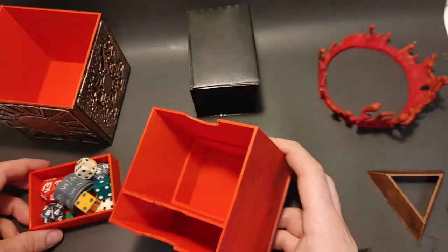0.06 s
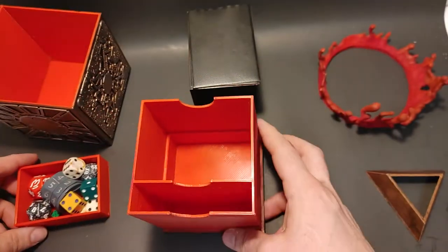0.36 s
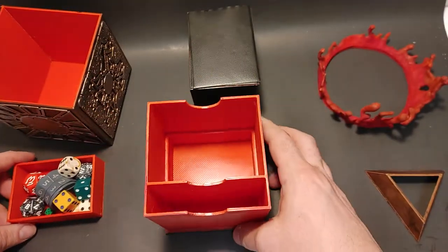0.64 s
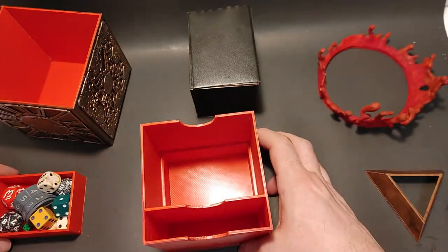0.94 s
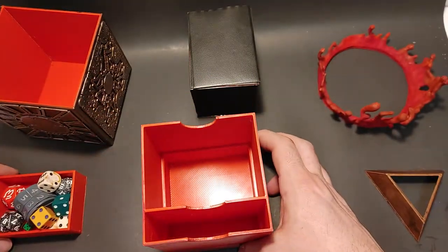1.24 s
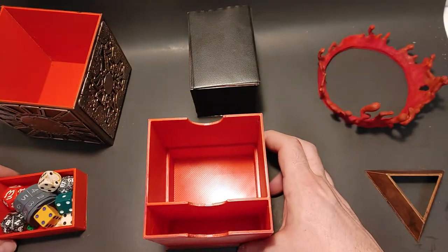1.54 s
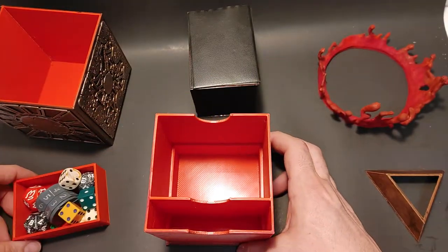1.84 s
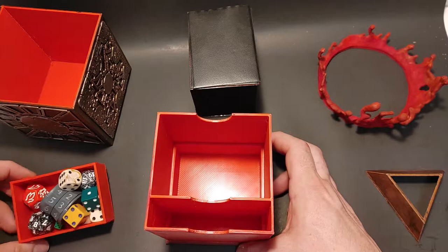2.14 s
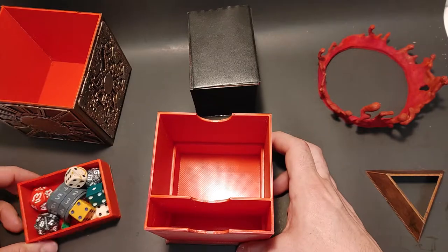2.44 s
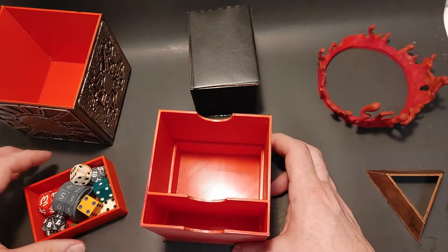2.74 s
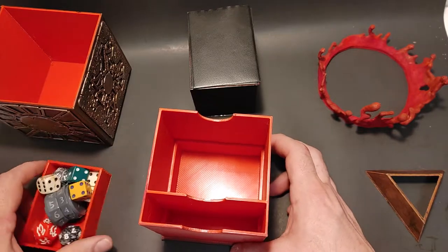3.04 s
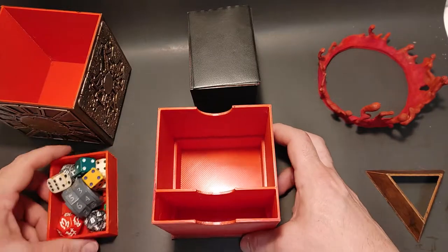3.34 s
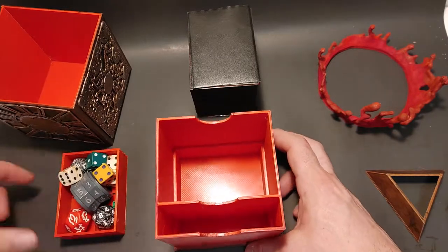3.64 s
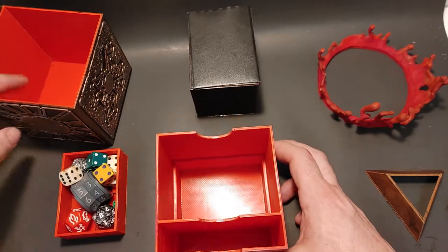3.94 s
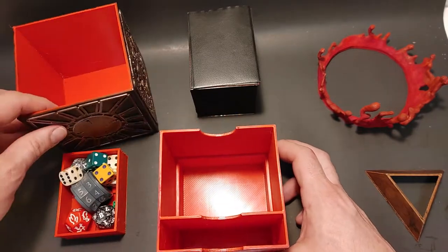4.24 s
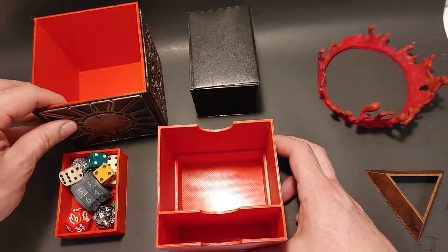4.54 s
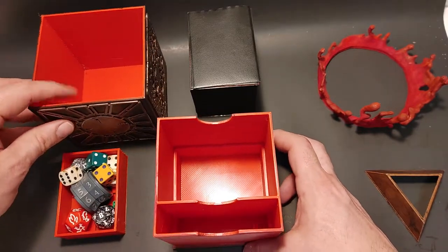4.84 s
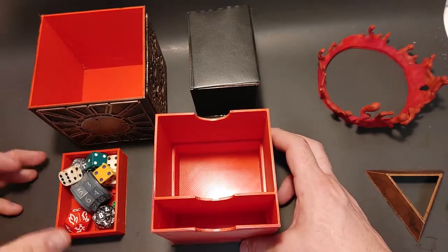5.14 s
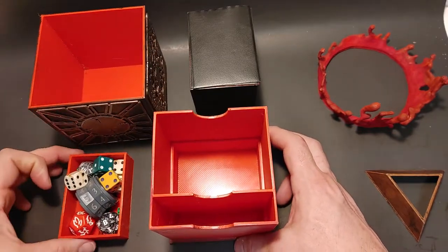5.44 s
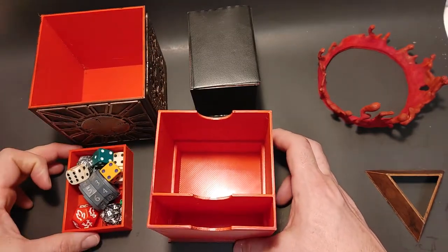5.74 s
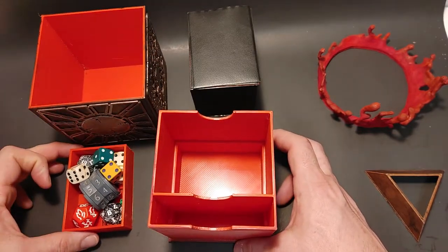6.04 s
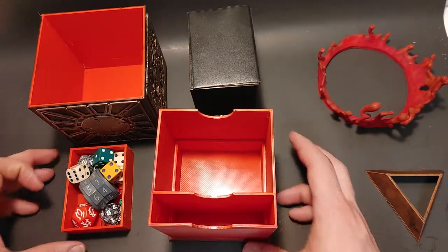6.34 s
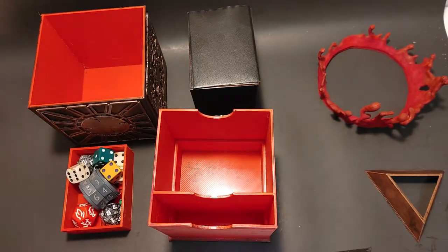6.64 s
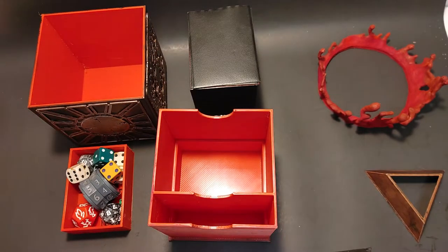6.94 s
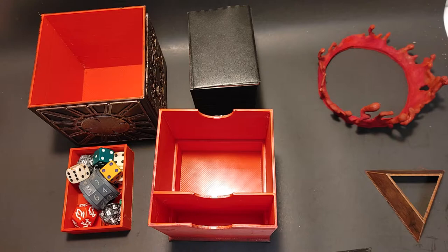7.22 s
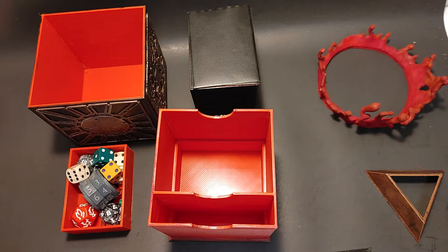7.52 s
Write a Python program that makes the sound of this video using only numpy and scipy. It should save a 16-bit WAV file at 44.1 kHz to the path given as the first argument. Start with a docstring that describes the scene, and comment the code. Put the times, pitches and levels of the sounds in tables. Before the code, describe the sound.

Close to a stereo microphone pair in a small room, a hollow plastic box bumps and slides over a table mat. Dice click lightly, then clatter as their little tray drops onto the table and gets shifted around. After a short, juddering scrape from a bigger box comes one more rattle of dice. Soft swishes of a hand follow, leaving only the low, slowly wavering hum of fans.

```python
"""A mat-covered table in a small room, close to a stereo pair of microphones; two fans hum throughout.
First an empty plastic box is set down and pushed about: its walls ring, its base rubs on the mat.
At 2.5 s a little tray of dice drops onto the table and is turned and nudged; the dice click and rebound.
At 4 s a larger box scrapes round, juddering, and at 5.4 s the dice rattle once more.
Last, a hand brushes the mat and leaves the fans beating against each other over a soft rush of air."""
import sys
import numpy as np
from scipy import signal
from scipy.fft import rfft, irfft, next_fast_len
from scipy.io import wavfile
from scipy.ndimage import map_coordinates

SR = 44100
rng = np.random.default_rng(int(sys.argv[2]) if len(sys.argv) > 2 else 0)


def master_out(mix):
    """Clip the mix to full scale and print it as 16-bit PCM to the path in sys.argv[1]."""
    frames = np.transpose(np.atleast_2d(mix))
    ceiling = np.clip(frames, -1, 1)
    pcm = np.round(ceiling * 32767).astype(np.int16)
    wavfile.write(sys.argv[1], SR, pcm)


N = 343098
TIME = np.arange(N) / SR
RING_TIME = np.arange(SR // 3) / SR


def dice(rebound_s=.027, loss_db=15.5, pan_db=.5):
    """Dice click on each other and the tray walls, then rock back twice, each time sooner and weaker."""
    # first contacts (time [s], level [dB], contact cut-off [Hz], scuff [dB])
    clicks = [(1.557, -58, 9000, 10), (1.586, -44, 6200, 12.5), (2.136, -39, 7500, 7.5),
              (2.166, -31.5, 4500, 0.5), (2.185, -39, 4850, 14), (2.200, -43.5, 6060, 3),
              (2.525, -35.5, 6760, -4), (2.540, -20.5, 5000, 2), (2.544, -27, 15500, -8),
              (2.549, -25, 7250, 2), (2.556, -24.5, 6940, 5), (2.636, -46.5, 3000, -7),
              (2.915, -46, 3020, 7), (2.943, -32, 11200, 1.5), (2.963, -37.5, 5000, 3),
              (3.007, -37.5, 4670, 9), (3.079, -38.5, 8000, 9), (3.174, -44, 3060, 8.5),
              (3.321, -49, 7000, -4), (3.357, -45, 7040, 16), (3.363, -30.5, 8060, 4),
              (3.371, -34, 7900, 8.5), (3.398, -40, 6000, 14), (3.437, -27.5, 7900, -4.5),
              (3.477, -32.5, 4080, -9.5), (5.413, -48, 4470, 12.5), (5.497, -35, 10400, 0),
              (5.511, -29.5, 8150, 10.5), (5.524, -33, 7100, -10), (5.567, -35, 8700, -10),
              (5.639, -31, 8400, -12), (5.668, -45.5, 6010, 0)]
    # main modes (frequency [Hz], relative level [dB], t60 before damping [s])
    modes = [(1820, -16, 0.01), (2030, 2, 0.13), (2200, -5.5, 0.1), (2320, -2, 0.18), (2546, 0.5, 0.26),
             (2706, 5.5, 0.11), (2776, 1.5, 0.088), (3100, -7.5, 0.14), (3003, -10.5, .05),
             (3570, -11.5, 0.014), (3845, 4.5, 0.15), (4144, 9, 0.14), (4370, -13.5, 0.076),
             (4800, -7.5, .06), (5360, -5, 0.085), (5640, 2, 0.09), (6340, -13.5, 0.0582), (6650, -4, 0.24),
             (6882, 10.5, 0.21), (7200, -11.5, .06), (9550, -1.5, 0.059), (10900, -11, .05),
             (11000, -6.5, .05), (12950, -5.5, .05)]
    # spectrum of the weak, fast-dying modes (frequency [Hz], relative level [dB])
    crowd = [(60, -53.5), (250, -27.5), (900, -16.5), (1600, -5), (2300, 2), (4200, 0), (7000, -1),
             (8200, -6.5), (11000, -6.5), (13500, -4.5), (16000, -7)]
    contacts = []
    for s, db, contact_hz, scuff_db in clicks:
        contacts.append((s, db, contact_hz, pan_db, scuff_db))
        for bounce in (1, 2):
            s += rebound_s / bounce * (1 + .2 * rng.uniform(-1, 1))
            contacts.append((s, db - loss_db * np.sqrt(bounce), contact_hz, pan_db, -2))
    return blows(contacts, modes, crowd, crowd_db=1, crowd_t60=.087, crack_db=-.5, vary_db=5,
                 graze_db=-12.5)


def tray():
    """The little dice tray knocks on the table and rings briefly."""
    # contacts (time [s], level [dB], contact cut-off [Hz], left over right [dB], scuff [dB])
    knocks = [(1.588, -48.5, 2500, -5, 18), (2.166, -49, 3000, 0, 8.5), (2.525, -37.5, 1770, -7, -1.5),
              (2.540, -20.5, 2490, -4.5, 1), (2.549, -23.5, 1300, -3.5, 1.5), (2.955, -50, 244, 3, 13),
              (3.011, -54.5, 2500, 4, 33.5), (3.080, -45.5, 2000, -3, -3), (3.363, -37.5, 2500, -3.5, 23),
              (3.380, -44, 1483, -9, 23.5), (3.437, -47.5, 247, 11, -10), (3.477, -47.5, 262, -1, -20),
              (5.414, -46.5, 237, 3, 8), (5.498, -41, 3000, -2.5, 19), (5.518, -54, 3038, -5, 30),
              (5.639, -50, 2000, 8, -23)]
    # main modes (frequency [Hz], relative level [dB], t60 before damping [s])
    modes = [(222, 1, .16), (335, 1, .13), (385, -3, .1), (515, -2, .09), (590, 1, .09), (705, -2, .08),
             (818, 3, .09), (915, -1, .09), (1007, -7, .09), (1310, -13, .06), (1772, -8, .08)]
    # spectrum of the weak, fast-dying modes (frequency [Hz], relative level [dB])
    crowd = [(40, -53), (170, -29.5), (235, -2.5), (600, -7), (900, -2.5), (1250, 4), (1700, -1),
             (3000, -9), (16000, -39.5)]
    return blows(knocks, modes, crowd, crowd_db=-4.5, crowd_t60=.074, crack_db=-13.5, vary_db=2,
                 graze_db=-24.5)


def empty_boxes():
    """Empty boxes meet the mat with dull, hollow knocks."""
    # contacts (time [s], level [dB], contact cut-off [Hz], left over right [dB], scuff [dB])
    knocks = [(.131, -29.5, 785, 1, 5), (.138, -23.5, 358, -4, -21.5), (.148, -33.5, 417, -10.5, 8.5),
              (.236, -39.5, 370, -4.5, 10), (.318, -47.5, 257, 4, 14), (.35, -50, 256, -6, 12.5),
              (.455, -42, 566, -2.5, 8), (.532, -24, 920, -4, 3.5), (.539, -27, 700, -4, 11),
              (.778, -38, 1060, 2.5, 13), (4.018, -57, 1500, 7, 24)]
    # main modes (frequency [Hz], relative level [dB], t60 before damping [s])
    modes = [(79, -10, .22), (224, 2.5, 0.18), (300, 6.5, 0.08), (332.6, 8, 0.081), (392, 10.5, 0.032),
             (516, -3, 0.16), (531, -0.5, 0.14), (630, -13.5, 0.11), (748, -3, 0.067), (876, -6, 0.1),
             (972, -6, 0.09), (1167, -6, .1), (2000, 4, 0.033)]
    # spectrum of the weaker modes (frequency [Hz], relative level [dB])
    crowd = [(30, -42), (60, -11), (80, 4), (125, -6), (175, -12), (290, -13), (420, -13.5), (700, -24),
             (1300, -31), (4000, -7.5), (16000, -34)]
    return blows(knocks, modes, crowd, crowd_db=-15.5, crowd_t60=.33, crack_db=-13, vary_db=1.5,
                 graze_db=-19)


def blows(contacts, modes, crowd, crowd_db, crowd_t60, crack_db, vary_db, graze_db):
    """Soft contacts are dull; square hits crack, scuffing ones graze first and wake more modes."""
    out = np.zeros((2, N))
    for s, db, contact_hz, pan_db, scuff_db in contacts:
        hit = strike(modes, crowd, crowd_db + scuff_db / 2, crowd_t60, crack_db - scuff_db, vary_db)
        rise_s = .0008 * from_db(2 * scuff_db)   # a scuff builds up more slowly
        hit = hit * (1 - np.exp(-RING_TIME / rise_s))
        hit = cut(cut(hit, contact_hz, "low"), 94, "high")   # small boxes radiate no deep bass
        onset_rms = np.sqrt(np.mean(hit[:, :SR // 50] ** 2))
        hit = from_db(db) * panned(hit / onset_rms, pan_db)
        add(out, s, hit)
        add(out, s - rng.uniform(.0024, .007), from_db(graze_db + scuff_db) * hit)
    return out


def strike(modes, crowd, crowd_db, crowd_t60, crack_db, vary_db):
    """One blow: a crack, a crowd of weak modes, and main modes whose strengths depend on the spot hit."""
    hz, db, t60 = np.array(modes, float).T[:, :, None]
    t60 = np.minimum(t60, .16 * (200 / hz) ** .3)   # plastic damps high modes sooner
    strength, detune, left, right = rng.standard_normal((4, len(hz), 1))
    lag = np.array([left, right]) * np.minimum(hz / 800, 2)   # short waves differ in phase at each mic
    angle = 2 * np.pi * hz * (1 + .004 * detune) * RING_TIME
    fade = from_db(-60 * RING_TIME / t60)
    gain = from_db(db + vary_db * strength) * rng.choice([-1, 1], hz.shape)
    gain = gain / np.sqrt(np.sum(gain ** 2) / 2)
    ring = np.sum(gain * fade * np.sin(angle + lag), axis=1)
    crowd_fade = from_db(crowd_db - 60 * RING_TIME / crowd_t60)
    crack_fade = from_db(crack_db - 60 * RING_TIME / .009)
    return ring + (crowd_fade + crack_fade) * noise(crowd, len(RING_TIME))


def scrape():
    """The large box judders as it turns in two pushes, and its hollow rings."""
    # pushes (start [s], length [s], level [dB], gain from start to end [dB])
    pushes = [(4.012, 0.16, -40, -4), (4.364, 0.13, -56.5, 5)]
    # spectrum of the scraping box (frequency [Hz], relative level [dB])
    colour = [(50, -35), (150, 3), (212, 5.5), (280, -7), (450, -6), (690, -4.5), (795, 9), (930, -8),
              (1300, -6), (1500, -6), (1900, -3), (2700, -3.5), (6000, -8), (16000, -17)]
    level = sum(from_db(db) * stroke(start, length, gain_db, attack_s=.0044, release_t60=.52)
                for start, length, db, gain_db in pushes)
    return panned(level * grain(per_s=360, depth_db=1.5) * noise(colour, N), db=1)


def rubbing(hands_off_s=7.4):
    """Boxes and fingers slide over the mat's fine grain; even the lightest touch gives a high sheen."""
    # slides (start [s], length [s], relative hiss [dB], relative rasp [dB], gain from start to end [dB])
    slides = [(0, 0.18, -63, -63, -11), (0.2, 0.18, -52.5, -60, -1), (0.467, 0.23, -53, -64, -2.5),
              (0.717, 0.24, -53.5, -53, 5), (1.41, .1, -78, -71.5, -2), (1.629, 0.2, -63.5, -63, 2.5),
              (2.095, 0.08, -62, -59, 8), (2.324, 0.04, -84, -67.5, 1), (2.465, 0.18, -70, -58.5, 1),
              (2.89, 0.061, -61.5, -56, 0), (2.98, 0.17, -51, -51.5, 1.5), (3.177, 0.059, -46, -60, 2.5),
              (3.27, 0.19, -58.5, -56.5, 17), (3.567, 0.39, -62, -59.5, -3.5), (4.67, 0.13, -69, -65.5, 10),
              (4.872, 0.44, -73.5, -66, 0), (5.33, 0.098, -67, -65, 2), (5.417, 0.068, -66, -58, 12),
              (5.655, 0.17, -72.5, -68.5, 1.5), (6.128, 0.037, -71, -63.5, -5),
              (6.246, 0.28, -68.5, -67.5, 11.5), (6.78, 0.15, -72.5, -69.5, 4.5)]
    # spectra of smooth sliding, rasp under pressure and sheen (frequency [Hz], relative level [dB])
    hiss_colour = [(1500, -32), (3000, -9), (4200, -1), (6800, 0.5), (8200, -7), (11000, -12.5),
                   (16000, -32)]
    rasp_colour = [(300, -5), (850, 3), (1400, -2.5), (2000, -3), (2900, -2.5), (4000, -2.5), (8000, -38.5)]
    sheen_colour = [(6000, -25), (9000, -4.5), (11000, -2.5), (13000, 0), (16000, -4.5)]
    resting = stroke(0, hands_off_s, 0)   # fingers stay on the boxes between slides
    hiss_level, rasp_level = from_db(-86.5) * resting, from_db(-87) * resting
    for start, length, hiss_db, rasp_db, gain_db in slides:
        push = stroke(start, length, gain_db)
        hiss_level = np.maximum(hiss_level, from_db(hiss_db) * push)
        rasp_level = np.maximum(rasp_level, from_db(rasp_db) * push)
    hiss = from_db(1) * hiss_level * noise(hiss_colour, N)
    sheen = panned(from_db(-29) * hiss_level ** .59 * noise(sheen_colour, N), db=3)
    rasp = from_db(-.5) * rasp_level * noise(rasp_colour, N)
    return (hiss + sheen) * grain(per_s=1800, depth_db=1.5) + rasp


def swipes():
    """Fingers and edges make quick, bright strokes that swell and stop."""
    # strokes (time [s], level [dB], length [s], low edge [Hz])
    strokes = [(0.513, -37.5, 0.041, 1090), (2.701, -56.5, 0.053, 2900), (5.185, -50, 0.026, 5800),
               (5.427, -52, 0.077, 4000), (6.422, -53, 0.11, 5860), (6.481, -51.5, 0.078, 3930)]
    colour = [(1000, 16), (6500, 18.4), (8500, 8.6), (16000, 5)]   # (frequency [Hz], relative level [dB])
    out = np.zeros((2, N))
    for s, db, length, low_hz in strokes:
        swish = rms_one(cut(noise(colour, len(RING_TIME)), low_hz, "high", order=5))
        swell = signal.windows.tukey(int(length * SR), .5)
        add(out, s, from_db(db) * swell * swish[:, :len(swell)])
    return out


def box_walls(x, ripple_db=4.5, per_s=12, width_hz=200):
    """Resonances of the plastic walls come and go as the point of contact moves."""
    hz, s, frames = signal.stft(x, SR, nperseg=512)
    knots = rng.standard_normal((512, 512))
    grid = np.meshgrid(hz / width_hz, s * per_s, indexing="ij")
    ripple = map_coordinates(knots, grid, order=1, mode="wrap")
    _, coloured = signal.istft(frames * rms_one(from_db(ripple_db * ripple)), SR, nperseg=512)
    return coloured[:, :N]


def squeaks():
    """Plastic sticks and slips, locking onto one wall mode for a moment."""
    # squeaks and groans (time [s], level [dB], pitch [Hz], length [s])
    slips = [(0.727, -56.5, 1144, 0.06), (2.903, -42.5, 2520, 0.057), (3.169, -39.5, 2085, .035),
             (3.587, -54, 1920, 0.036), (3.757, -52, 907, 0.086), (4.088, -36, 208, 0.044),
             (4.392, -54, 2550, 0.011), (4.926, -52.5, 1927, 0.036), (5.019, -66, 4100, 0.15),
             (5.435, -48.5, 5270, 0.064)]
    out = np.zeros((2, N))
    for s, db, hz, length in slips:
        band = [(hz / 2, -51), (hz * .95, -25), (hz, 0), (hz * 1.05, -25), (hz * 2, -51)]
        age = 4 * RING_TIME / length
        add(out, s, from_db(db) * noise(band, len(RING_TIME)) * age * np.exp(1 - age))
    return out


def fans(steady_hz=118.4, air_db=-60.67):
    """Room tone: two fans of nearly equal speed beat slowly over a soft rush of air."""
    # the wandering fan's hum (time [s], frequency [Hz], level [dB])
    drift = [(0.0, 107.9, -51), (0.5, 112.5, -54.5), (1.23, 114, -67.5), (2.82, 108.3, -59.5),
             (4.35, 111.0, -50.5), (5.31, 107.5, -53.5), (6.07, 113.3, -64), (7.5, 114.5, -64.5),
             (7.78, 110, -58.5)]
    # the steady fan's weaker lines (frequency [Hz], level [dB])
    lines = [(59.2, -82.5), (360.7, -74), (597.5, -76.5), (796.7, -77), (888.2, -81)]
    # spectrum of the moving air (frequency [Hz], relative level [dB])
    air = [(15, -25), (40, -4.5), (85, 1), (145, -5), (220, -1.5), (250, -6.5), (345, -1.5), (520, -6),
           (700, -11.5), (820, -7), (1020, -14.5), (1600, -17.5), (4000, -29.5), (8000, -45), (13000, -31),
           (16000, -36)]
    times, pitches, levels = np.transpose(drift)
    hz, db = np.interp(TIME, times, pitches), np.interp(TIME, times, levels)
    wandering = from_db(db) * np.sin(2 * np.pi * np.cumsum(hz) / SR)
    weak_lines = sum(from_db(level) * np.sin(2 * np.pi * (f * TIME + rng.random())) for f, level in lines)
    main_db = (db - 59) / 2   # swells and fades with the wandering fan, half as far
    main_line = from_db(main_db) * np.sin(2 * np.pi * steady_hz * TIME)
    hum = np.sqrt(2) * (wandering + main_line + weak_lines)
    return hum + from_db(air_db) * noise(air, N, alike_hz=416.6)


def room(x, wet_db=-17, onset_s=.0062):
    """Diffuse echoes from nearby walls reach the microphones after the direct sound; treble dies first."""
    # room decay (frequency [Hz], t60 [s])
    decay = [(100, .35), (300, .22), (3000, .24), (7000, .19), (14000, .12)]
    edges_hz = np.geomspace(40, 18000, 8)
    white = noise([(40, 0), (18000, 0)], len(RING_TIME))
    tail = np.zeros_like(white)
    for low, high in zip(edges_hz, edges_hz[1:]):
        t60 = at_hz(decay, np.sqrt(low * high))
        tail += cut(white, [low, high], "band") * from_db(-60 * RING_TIME / t60)
    tail *= np.minimum(RING_TIME / onset_s, 1) ** 2
    tail /= np.sqrt(np.sum(tail ** 2) / 2)
    return x + from_db(wet_db) * signal.fftconvolve(x, tail, axes=1)[:, :N]


def stroke(start, length, gain_db, attack_s=.015, release_t60=.19):
    """Envelope of a push: it gets going, speeds up or slows down evenly, then dies away."""
    age = TIME - start
    drift_db = gain_db * (np.clip(age / length, 0, 1) - .5)
    release_db = -60 * np.clip((age - length) / release_t60, 0, 2)
    return np.clip(age / attack_s, 0, 1) * from_db(drift_db + release_db)


def grain(per_s, depth_db):
    """Uneven gain of a surface that catches and slips; unit power."""
    knots = rng.standard_normal(N // 8)
    return rms_one(from_db(depth_db * np.interp(TIME * per_s, np.arange(len(knots)), knots)))


def noise(colour, size, alike_hz=600):
    """Coloured stereo noise; the two microphones agree only on long waves."""
    padded = next_fast_len(size)
    hz = np.arange(padded // 2 + 1) * SR / padded
    mid, side = rfft(rng.standard_normal((2, padded)))
    alike = 1 / (1.05 + (hz / alike_hz) ** 2)
    pair = np.sqrt(1 + alike) * mid + np.sqrt(1 - alike) * side * [[1], [-1]]
    return rms_one(irfft(pair * from_db(at_hz(colour, hz)), padded)[:, :size])


def from_db(db):
    """Decibels to gain."""
    return 10 ** (np.asarray(db) / 20)


def rms_one(x):
    """Scale to unit power."""
    return x / np.sqrt(np.mean(x ** 2) + 1e-20)


def at_hz(points, hz):
    """Read a table on a log-frequency axis."""
    f, value = np.transpose(points)
    return np.interp(np.log(np.maximum(hz, 1)), np.log(f), value)


def cut(x, hz, kind, order=2):
    """Causal low-, high- or band-pass."""
    return signal.sosfilt(signal.butter(order, hz, kind, fs=SR, output="sos"), x)


def panned(x, db):
    """Favour the left microphone over the right by db."""
    return x * from_db([[db / 2], [-db / 2]])


def add(out, s, sound):
    """Mix a sound in at time s."""
    at = max(round(s * SR), 0)
    out[:, at:at + sound.shape[1]] += sound[:, :N - at]


def scene():
    """Knocks, clicks and squeaks with a little room on them, close dry slides, and the fans behind."""
    knocks = empty_boxes() + tray() + dice()
    slides = box_walls(rubbing() + scrape() + swipes())
    return room(knocks + squeaks()) + slides + fans()


def record(dry):
    """The recorder cuts the treble steeply above 16.2 kHz."""
    return signal.sosfilt(signal.ellip(10, .1, 80, 16200, fs=SR, output="sos"), dry)


dry = scene()
out = record(dry)
master_out(out)
```